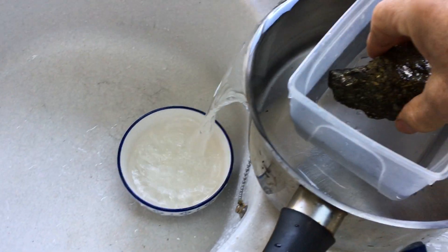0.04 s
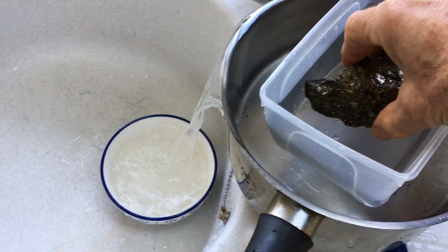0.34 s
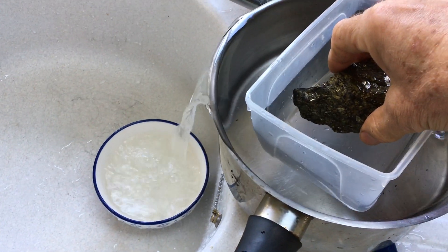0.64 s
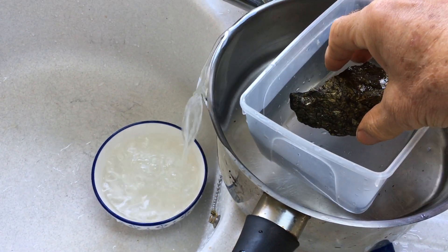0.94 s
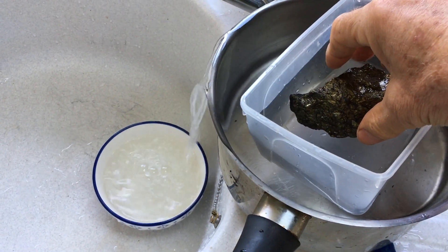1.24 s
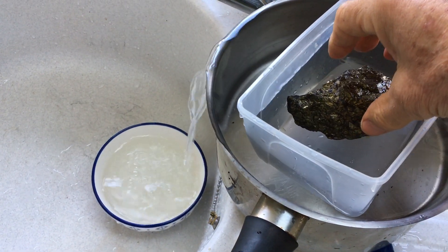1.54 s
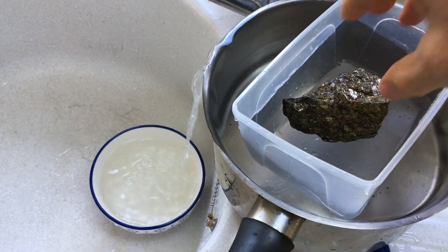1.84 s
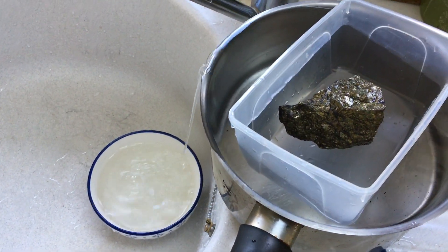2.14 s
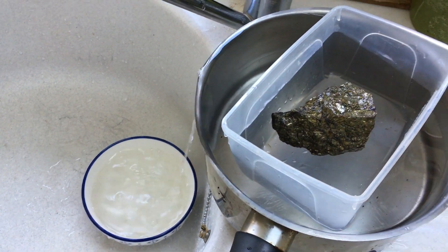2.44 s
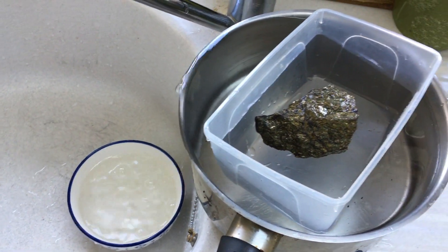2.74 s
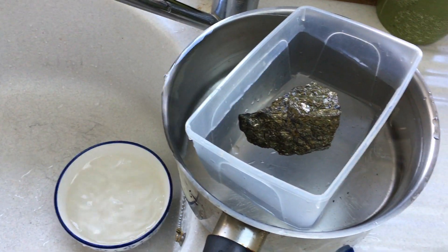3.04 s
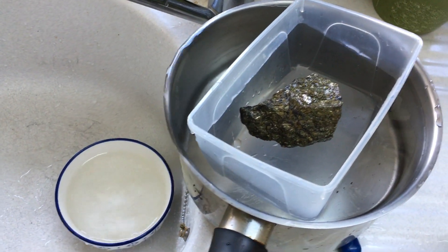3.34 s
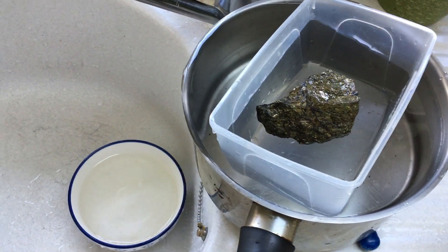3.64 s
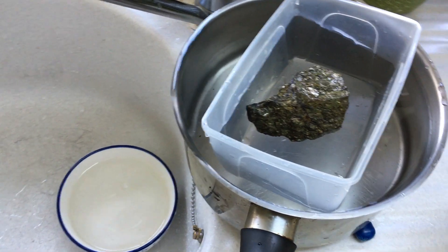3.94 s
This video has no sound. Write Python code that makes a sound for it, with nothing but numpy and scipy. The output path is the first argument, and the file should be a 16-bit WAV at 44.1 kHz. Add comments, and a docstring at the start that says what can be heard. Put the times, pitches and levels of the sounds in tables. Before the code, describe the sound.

A thin stream of water spills into a filled bowl, bubbling and spattering close by. It weakens into single plops and last drips, with a slight ring from the bowl and sink, leaving only quiet room hush.

```python
"""Water trickles and burbles, breaks into separate plops and ends in a few drips in a quiet room.
A thin stream spills from a full pan into a small bowl of water standing in a sink.
It drags in short-lived air bubbles of all sizes, each ringing at its own pitch, and throws fine spray.
Bowl, sink and kitchen ring with them."""
import sys
import numpy as np
from scipy import signal
from scipy.fft import rfft, irfft
from scipy.io import wavfile
from scipy.ndimage import uniform_filter1d

SR = 44100
rng = np.random.default_rng(int(sys.argv[2]) if len(sys.argv) > 2 else 0)


def inscribe(sig):
    """Save sig as 16-bit PCM at rate SR to the path in sys.argv[1].

    A 1-D sig is mono; a 2-D sig holds one channel per row.
    Samples are clipped to [-1, 1] before scaling.
    """
    pcm = np.round(np.clip(np.atleast_2d(sig).T, -1, 1) * 32767)
    wavfile.write(sys.argv[1], SR, pcm.astype(np.int16))


N = 176400


def amp(db):
    """Decibels to gain."""
    return 10 ** (np.asarray(db) / 20)


def at_hz(rows, hz):
    """Interpolate (hz, value) rows on a log-frequency axis."""
    row_hz, value = np.transpose(rows)
    return np.interp(np.log(hz + 1), np.log(row_hz + 1), value)


def curve(rows, column):
    """One column of a time table, per sample."""
    rows = np.array(rows)
    return np.interp(np.arange(N) / SR, rows[:, 0], rows[:, column])


def add(mix, start_s, sound):
    """Mix a sound in at start_s."""
    part = mix[max(round(start_s * SR), 0):][:len(sound)]
    part += sound[:len(part)]


def noise(gain):
    """Noise shaped by gain(hz); rms 1."""
    x = irfft(rfft(rng.standard_normal(N)) * gain(np.fft.rfftfreq(N, 1 / SR)), N)
    return x / np.sqrt(np.mean(x ** 2) + 1e-20)


def room_hush(level_db=-68):
    """Steady room noise, strongest in the bass."""
    # noise spectrum: freq_hz, density_db
    spectrum = [(15, -35), (25, -4.5), (59, -9.5), (164, -11.5), (233, -13), (340, -10.5), (537, -18.5),
                (648, -15.5), (997, -17), (1140, -15), (5010, -28.5), (9810, -29.5), (15500, -32)]
    return amp(level_db) * noise(lambda hz: amp(at_hz(spectrum, hz)))


def rumble(centre_hz=51.2, width_hz=3.6, skirt_db=-11.5, trim_db=2.5):
    """Low rumble that comes and goes: a narrow noise peak with a skirt above it."""
    # rumble envelope: time_s, level_db
    levels = [(0.0, -72), (0.13, -67), (0.28, -77), (0.46, -68.5), (0.9, -70.5), (1.31, -60), (2.38, -69),
              (2.52, -63), (2.63, -77.5), (3.79, -76), (3.82, -71), (4.0, -79)]

    def gain(hz):
        peak = np.exp(-.5 * ((hz - centre_hz) / width_hz) ** 2)
        skirt = amp(skirt_db) * (hz > centre_hz) / (1 + (hz / 190) ** 4)
        return peak + skirt

    return amp(curve(levels, 1) + trim_db) * noise(gain)


def diffuse_response(sink_t60_s=0.018, sink_db=-5.5, room_db=-10, size=16384):
    """Impulse response: quick flutter inside the sink, then the kitchen's tail."""
    # kitchen reverberation: freq_hz, t60_s
    room_t60 = [(300, 0.66), (1200, 0.36), (3000, 0.25), (8000, 0.32), (15000, 0.086)]
    t = np.arange(size) / SR
    flutter = rng.standard_normal(size) * amp(-60 * t / sink_t60_s)
    flutter *= np.clip(t / 0.0014 - .5, 0, 1)
    hz, frame_s, spectra = signal.stft(rng.standard_normal(size), SR, nperseg=256)
    decay = amp(-60 * frame_s / at_hz(room_t60, hz)[:, None])
    tail = signal.istft(spectra * decay, SR)[1][:size] * np.minimum(t / 0.015, 1)
    return amp(sink_db) * flutter / np.linalg.norm(flutter) + amp(room_db) * tail / np.linalg.norm(tail)


def echoes(x, wander_hz=3.1, spots=6):
    """Direct sound, near walls, and diffuse echoes that change as the splash wanders about the bowl."""
    # reflections off sink walls and pan: delay_s, gain
    walls = [(.0011, 0.4), (.0026, 0.51), (.0034, -0.31), (.0063, -0.47), (.0082, -0.085), (0.0133, 0.38)]
    out = x.copy()
    dulled = np.convolve(x, np.array([1, 4, 1]) / 6, "same")
    for delay_s, gain in walls:
        add(out, delay_s, gain * dulled)
    place = np.arange(N) / SR * wander_hz * spots
    for spot in range(spots):  # crossfade round a loop, one response per spot
        distance = abs((place - spot + spots / 2) % spots - spots / 2)
        weight = np.cos(np.pi / 2 * np.minimum(distance, 1))
        out += signal.oaconvolve(x * weight, diffuse_response())[:N]
    return out


def sink_ring(x, size=8192):
    """Bowl and sink ring at their resonances: a minimum-phase filter."""
    # peaks and dips of bowl and sink: centre_hz, width_hz, gain_db
    resonances = [(296.4,19,6), (374,32,3), (420,12.3,1), (506,41,2.5), (607.5,48,16), (711,8.7,5.5),
                  (778,24,1.5), (890,54,-5.5), (1010.7,26,9), (1126,98,-3), (1233,33,2), (1263.6,30,7),
                  (1290,30,4), (1418,32,8.5), (1517,40,-5), (1645,25,1), (1623,48,-8), (1944,67,-7),
                  (2140,15,7.5), (2280,26,-0.5), (2660,12,3.5), (3160,190,-3.5), (3288,80,6.5),
                  (4010,290,6), (4770,390,-4), (5300,90,-1.5), (7400,820,-3), (9600,530,3)]
    hz = abs(np.fft.fftfreq(size, 1 / SR))
    gain_db = sum(db / (1 + (2 * (hz - centre_hz) / width_hz) ** 2)
                  for centre_hz, width_hz, db in resonances)
    log_spectrum = np.conj(signal.hilbert(np.log(amp(gain_db))))
    response = np.fft.ifft(np.exp(log_spectrum)).real
    return signal.oaconvolve(x, response[:size // 2])[:N]


def bubble(pitch_hz, decay_cycles, onset_cycles=0.18, rise_per_cycle=0.0049):
    """Trapped air rings briefly, rising in pitch as it nears the surface; peak 1."""
    size = int(np.log(1000) * decay_cycles * SR / pitch_hz) + 2  # to -60 dB
    age_cycles = np.arange(size) * pitch_hz / SR
    envelope = (1 - np.exp(-age_cycles / onset_cycles)) ** 2 * np.exp(-age_cycles / decay_cycles)
    volume = envelope * np.sin(2 * np.pi * age_cycles * (1 + .5 * rise_per_cycle * age_cycles))
    pressure = np.diff(volume, prepend=0)
    return pressure / abs(pressure).max()


def splash(band_hz, decay_s, size=256):
    """Impact on the surface: a very short noise burst; peak 1."""
    burst = rng.standard_normal(size) * np.exp(-np.arange(size) / SR / decay_s)
    burst = signal.lfilter(*signal.butter(2, band_hz, "band", fs=SR), burst)
    return burst / abs(burst).max()


def swarm(low_hz, high_hz, rate_per_s, decay_cycles, spread_db, pitches=24):
    """Bubbles of one size class at random times, fewer as the stream thins; rms held near 1."""
    rate_share = np.interp(np.arange(N) / SR, [0, 2.4], [1, .45])
    born = rng.random(N) < rate_per_s * rate_share / SR
    strength = born * amp(spread_db * np.clip(rng.standard_normal(N), -2, 2))
    pitch_index = rng.integers(0, pitches, N)
    out = np.zeros(N)
    for k, hz in enumerate(np.geomspace(low_hz, high_hz, pitches)):
        out += signal.oaconvolve(strength * (pitch_index == k), bubble(hz, decay_cycles))[:N]
    power = uniform_filter1d(uniform_filter1d(out ** 2, size=3500), size=2500)
    return out / np.sqrt(abs(power) + 0.044 * power.mean())


def stream(gain_db=-5):
    """The falling stream stirs up bubbles in five size classes."""
    # bubbling level by size: time_s, gulps_db, large_db, medium_db, small_db, spray_db
    flow = [(0,-59,-31.5,-30.5,-44,-44.5), (.05,-66,-50.5,-42,-47,-47.5), (.11,-67.5,-38.5,-34.5,-32,-39.5),
            (.19,-58,-47.5,-35.5,-45.5,-48), (.28,-66,-47.5,-36,-47.5,-46), (.45,-58,-44,-36.5,-37,-42),
            (.52,-58,-51,-40.5,-44.5,-48), (.65,-49.5,-45.5,-41.5,-43.5,-45), (.73,-53,-43,-33.5,-41,-43.5),
            (.86,-53,-54,-43.5,-50.5,-49), (.97,-64,-53,-42,-41,-46.5), (1.08,-48.5,-42.5,-38,-45.5,-47.5),
            (1.2,-55,-48,-40,-45,-50.5), (1.27,-47,-48,-40,-36.5,-42), (1.49,-51.5,-46,-39,-47,-52),
            (1.62,-46,-44,-39,-42,-44.5), (1.72,-50,-62,-41.5,-41,-48.5), (1.81,-50,-39,-38.5,-41,-41),
            (1.89,-41.5,-45.5,-59,-52,-52), (1.95,-63.5,-38,-43.5,-39.5,-57),
            (2.09,-46,-57.5,-42,-43.5,-50), (2.19,-54,-49,-46,-44,-51.5), (2.25,-64,-47,-51,-49,-54),
            (2.35,-70,-50.5,-46.5,-56,-54), (2.44,-61.5,-51,-47,-39,-45), (2.53,-68,-49.5,-48.5,-54,-52),
            (2.61,-83,-63,-46.5,-66,-77), (2.69,-67.5,-83,-58,-59.5,-74), (2.85,-71,-78,-71,-68,-70),
            (3.1,-91,-95,-102,-95,-99)]
    # size classes, gulps to spray: low_hz, high_hz, rate_per_s, decay_cycles, spread_db, trim_db
    sizes = [(263, 402, 90, 1.6, 1.5, -3.5), (644.4, 1182, 220, 3.13, 1.5, -3),
             (1194, 2493, 450, 3, 3, -1.5), (2840, 6430, 400, 3.8, 3.5, -3.5),
             (6823, 14500, 320, 2.55, 5.5, -7)]
    out = np.zeros(N)
    for column, (*size_class, trim_db) in enumerate(sizes, start=1):
        out += swarm(*size_class) * amp(curve(flow, column) + trim_db)
    return amp(gain_db) * out


def glugs(decay_cycles=7.7):
    """Big air pockets pulled under as the stream breaks up."""
    # air pockets: start_s, level_db, pitch_hz
    pockets = [(2.163,-40,994), (2.188,-46,591), (2.278,-47.5,666), (2.308,-42.5,730), (2.379,-38.5,977),
               (2.408,-42.5,687), (2.472,-50.5,660), (2.502,-50,632), (2.583,-44,813), (2.598,-46,1027),
               (2.615,-50,1184), (2.978,-68.5,600)]
    out = np.zeros(N)
    for start_s, level_db, pitch_hz in pockets:
        add(out, start_s, amp(level_db) * bubble(pitch_hz, decay_cycles))
    return out


def snaps(splash_trim_db=-2, ping_trim_db=1.5):
    """Droplets snap on the surface, each with a tiny bubble's ping."""
    # droplet impacts: start_s, level_db, pitch_hz, decay_cycles
    droplets = [(0.106, -36, 9100, 2.7), (0.346, -38, 11200, 2), (0.44, -32, 8100, 2.8),
                (0.6813, -37, 11950, 2.4), (1.2533, -31.5, 12600, 2.4), (1.3655, -27.5, 11500, 2),
                (1.3859, -24, 12500, 1.8), (1.496, -29, 9650, 2.9), (1.698, -35, 8100, 1.8),
                (1.7688, -30.5, 9200, 2.8), (1.7855, -59, 9300, 2), (1.8041, -29.5, 8300, 1.7),
                (1.8127, -44, 12600, 2), (1.947, -31.5, 9000, 2.4), (2.0336, -38, 13500, 2.3),
                (2.0839, -34, 9600, 1.4), (2.4017, -26, 8100, 2.5), (2.4103, -28, 9600, 1.7),
                (2.4377, -41, 8300, 2), (2.475, -27.5, 8560, 2), (2.5158, -47, 9300, 1.8),
                (2.5725, -48, 13900, 2.5), (2.5811, -58, 9200, 1.8), (2.6, -51, 11400, 2),
                (2.609, -41, 12100, 2), (2.6203, -54, 15000, 2), (2.6302, -42, 9200, 9.8),
                (2.6963, -43, 12100, 2), (2.7253, -43, 9050, 2), (2.7634, -45, 10000, 1.7),
                (2.8784, -47, 10100, 5.6), (2.9427, -49.5, 13800, 2.3), (3.0173, -54, 13000, 2),
                (3.241, -75, 9700, 2)]
    out = np.zeros(N)
    for start_s, level_db, pitch_hz, decay_cycles in droplets:
        add(out, start_s, amp(level_db + splash_trim_db) * splash((4530, 15500), decay_s=0.00046))
        add(out, start_s, amp(level_db + ping_trim_db) * bubble(pitch_hz, decay_cycles))
    return out


def plops(bubble_trim_db=0.5, splash_trim_db=2.5):
    """Distinct plops: one ringing bubble and one splash each."""
    # drops hitting the water: start_s, level_db, pitch_hz, decay_cycles, splash_db
    drops = [(0.014, -30, 2170, 3.8, -42), (0.0668, -27.0, 2130, 2.9, -33), (0.089, -24.5, 2220, 2, -27),
             (0.097, -26.5, 1670, 4.3, -28.5), (0.1255, -23.5, 2120, 4.7, -41),
             (0.156, -24, 1430, 1.4, -22.5), (0.1981, -28.5, 2100, 2.9, -40), (0.212, -28, 1740, 2.5, -40),
             (0.3071, -23.5, 1886, 1, -36), (0.3153, -28, 1680, 4, -29), (0.4398, -23.5, 1250, 2.1, -42),
             (0.4506, -30, 1100, 1.7, -47), (0.4587, -29, 2300, 3.4, -46),
             (0.5542, -31.5, 1290.0, 4.0, -51), (0.5815, -34.5, 674, 0.66, -36),
             (0.606, -29, 1840, 3.1, -42), (0.6813, -28, 1810, 2.6, -42), (0.7016, -27, 1670, 1.4, -30),
             (0.7335, -45, 2010.0, 2.3, -39), (0.7624, -30.5, 1760, 6.1, -52),
             (0.9086, -30.5, 1470, 3.3, -47), (0.992, -32.5, 2650, 3.6, -28),
             (1.0577, -36, 1290, 1.9, -31.5), (1.1363, -31, 2450, 2.2, -28.5),
             (1.2522, -33, 1540, 2.4, -27), (1.363, -25, 1740, 1.66, -19.5),
             (1.384, -28.0, 1100.0, 0.79, -32), (1.422, -24.5, 1560, 2, -28.5),
             (1.554, -34, 1540, 2.5, -26), (1.5995, -24.5, 3930, 2.6, -25.5),
             (1.6866, -32.5, 1350, 1.3, -34.5), (1.7545, -30, 1390, 1.9, -50),
             (1.7887, -25, 2530, 1.8, -29.5), (1.8033, -20, 1290.0, 2, -31),
             (1.8415, -29, 1550, 2.2, -30.5), (1.921, -30, 1440, 2.7, -43), (1.9317, -26.5, 1690, 3.1, -28),
             (1.945, -27, 2700, 1.8, -31), (2.0136, -33, 1450, 2.3, -30), (2.06, -26, 5680, 3.2, -35),
             (2.0747, -26, 2550, 2.46, -33.5), (2.0823, -25, 1910, 2.4, -23.5),
             (2.1517, -33, 4100, 4.2, -38), (2.1636, -36, 860, 0.98, -25), (2.264, -33.5, 1780, 2.5, -44),
             (2.3519, -27, 3225, 1.6, -44), (2.3806, -26.0, 1557, 6.7, -39),
             (2.4017, -13.5, 4560, 1.5, -47), (2.4124, -24, 1930, 1.4, -24), (2.4389, -28.5, 3430, 2, -22),
             (2.442, -21.5, 1620, 1.5, -38), (2.4752, -27, 3780, 0.99, -25),
             (2.5811, -32.5, 4140, 1.4, -36), (2.5872, -44, 940, 2.5, -53), (2.6345, -29, 2780, 1.5, -55),
             (2.693, -49, 6200, 2.0, -64), (2.7267, -29, 1660, 2.4, -44), (2.8425, -57, 4200, 7.3, -70),
             (2.9148, -56.5, 4190, 10, -72)]
    out = np.zeros(N)
    for start_s, level_db, pitch_hz, decay_cycles, splash_db in drops:
        add(out, start_s, amp(level_db + bubble_trim_db) * bubble(pitch_hz, decay_cycles))
        add(out, start_s, amp(splash_db + splash_trim_db) * splash((1100, 5100), decay_s=0.00029))
    return out


def scene():
    """Water in the sink over the quiet room; mono."""
    water = stream() + plops() + glugs() + snaps()
    return (echoes(sink_ring(water)) + rumble() + room_hush())[None]


def record(dry):
    """Steep low-pass."""
    cutoff_hz = 15950
    taps = signal.firwin(401, cutoff_hz, window=("kaiser", 8), fs=SR)
    return signal.oaconvolve(dry, taps[None], "same")


dry = scene()
out = record(dry)
inscribe(out)
```